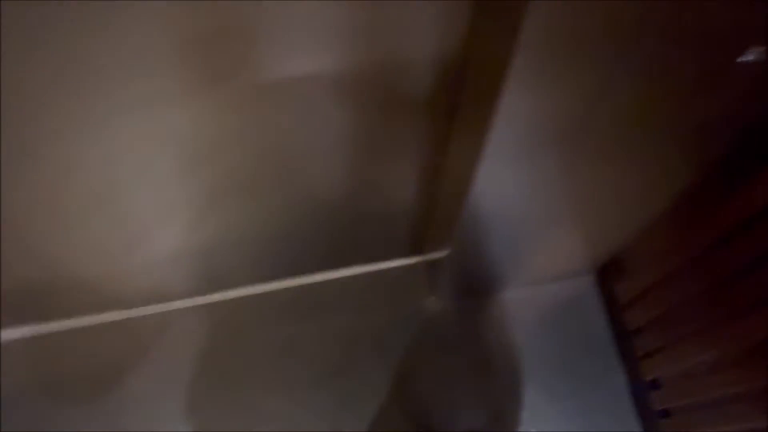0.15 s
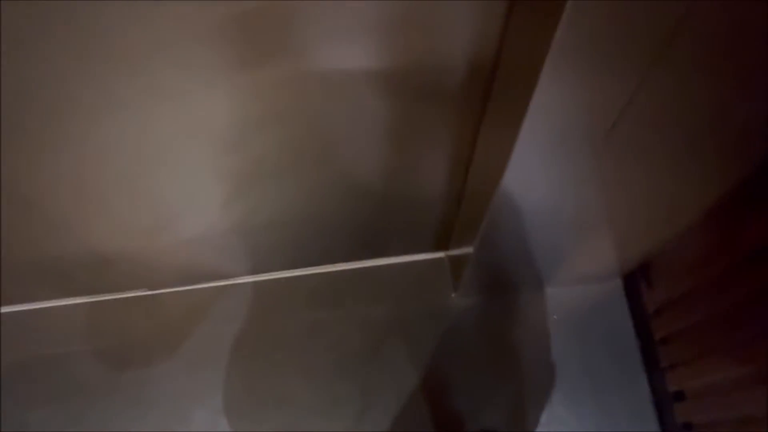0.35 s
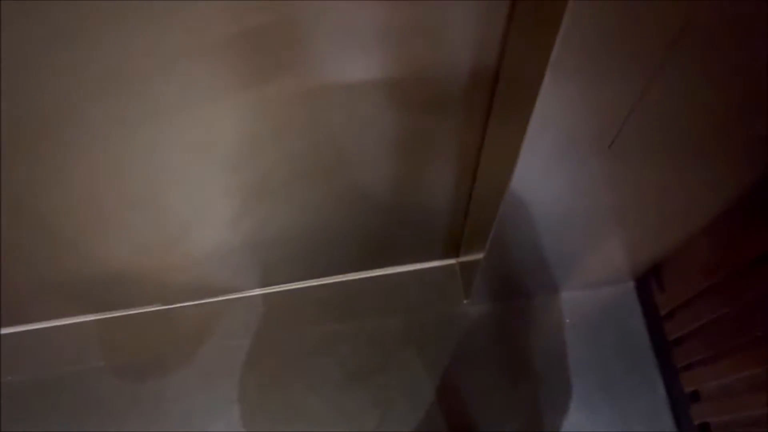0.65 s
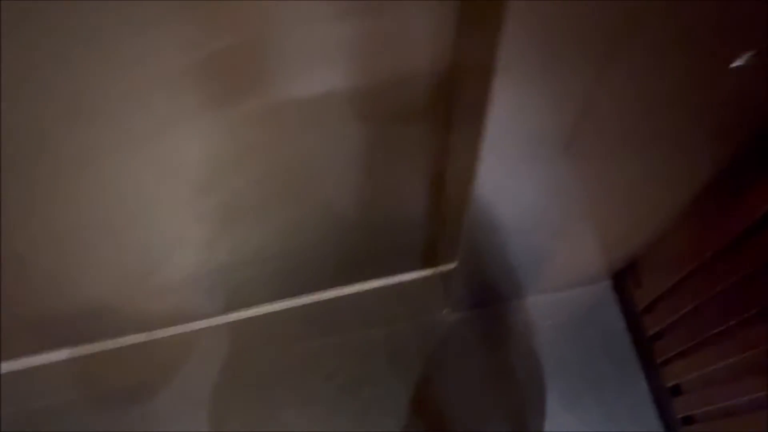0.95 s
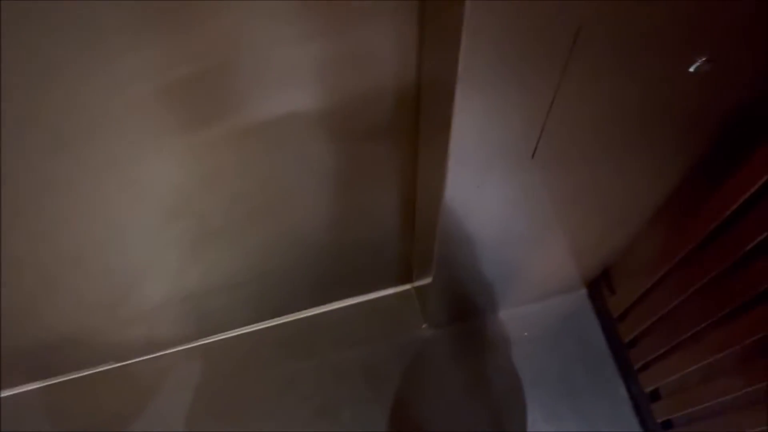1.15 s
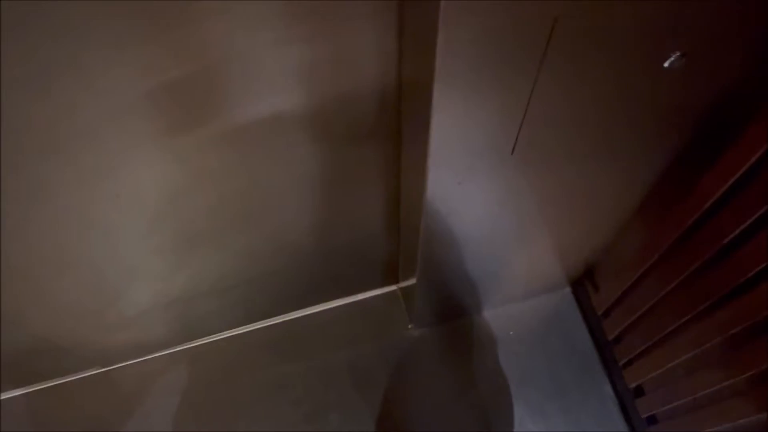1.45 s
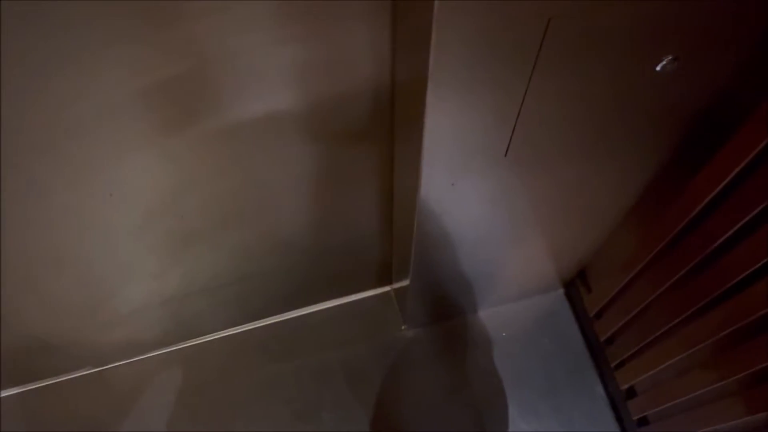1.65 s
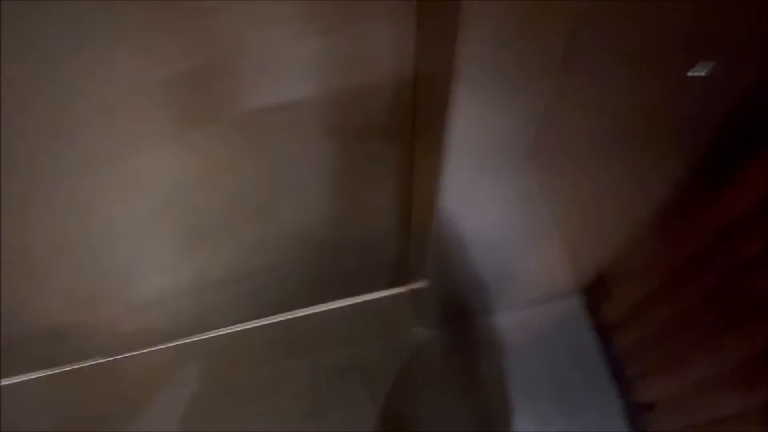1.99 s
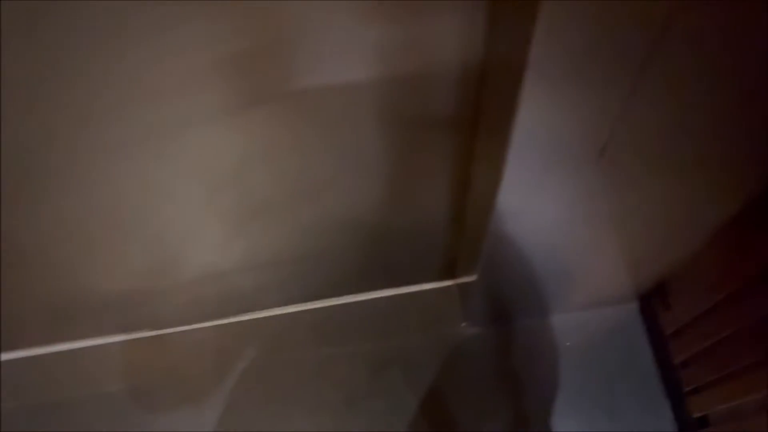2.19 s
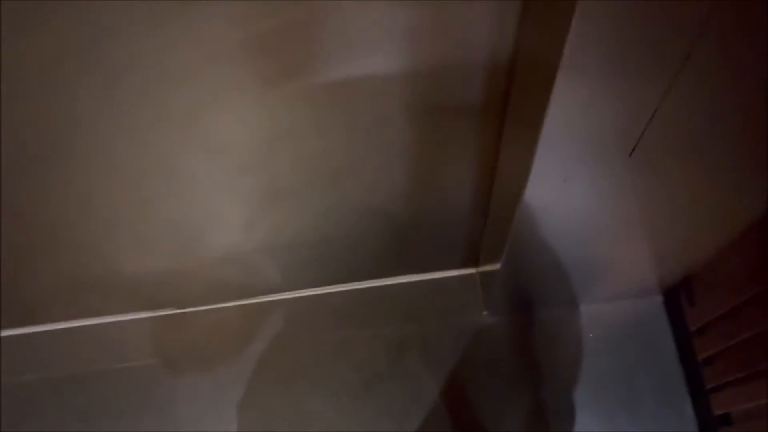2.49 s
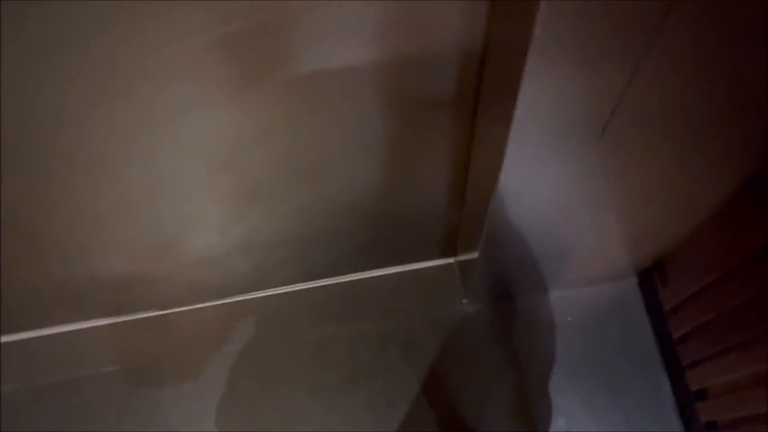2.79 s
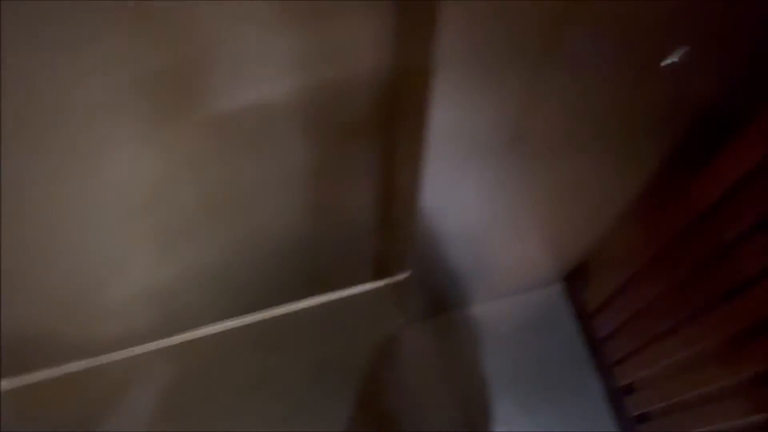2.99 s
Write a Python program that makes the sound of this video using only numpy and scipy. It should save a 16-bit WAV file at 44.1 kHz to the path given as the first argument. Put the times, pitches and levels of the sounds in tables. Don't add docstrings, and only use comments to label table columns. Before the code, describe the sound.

Low steady hum and rumble of a moving lift cabin, with one knock and faint bumps

```python
import sys
import numpy as np
from scipy import signal
from scipy.fft import rfft, irfft
from scipy.io import wavfile
from scipy.ndimage import uniform_filter1d

SR = 44100
rng = np.random.default_rng(int(sys.argv[2]) if len(sys.argv) > 2 else 0)


def int16_out(signal):
    q = np.round(np.clip(np.atleast_2d(signal).T, -1, 1) * 32767)
    wavfile.write(sys.argv[1], SR, q.astype(np.int16))


def gain_from_db(level_db):
    decades = np.asarray(level_db, float) / 20
    return 10 ** decades


N = 138474
T = np.arange(N) / SR
SWELL_DB = 0.6

# f/Hz, density/dB
CLOTH_SPECTRUM = [(1200, 11.5), (3000, 12.5), (6000, -2), (10000, -11), (15000, -21.5)]
# f/Hz, density/dB
CRACK_SPECTRUM = [(300, 15.5), (1000, 16), (2000, 0), (4500, -14), (7000, -12), (11000, -2.5),
                  (15000, -10.5)]


def unit(x):
    return x / np.sqrt(np.mean(x ** 2))


def band(x, hz, width):
    return signal.lfilter(*signal.iirpeak(hz, hz / width, fs=SR), x)


def shape(table, hz):
    points = np.array(table)
    return np.interp(np.log(hz), np.log(points[:, 0]), points[:, 1])


def coloured(table):
    hz = np.maximum(np.arange(N // 2 + 1) * SR / N, 1)
    spectrum = rfft(rng.standard_normal(N)) * gain_from_db(shape(table, hz))
    return unit(irfft(spectrum, N))


def walk(rate):
    hold = int(SR / rate)
    steps = np.repeat(rng.standard_normal(N // hold + 1), hold)
    return 1.3 * uniform_filter1d(uniform_filter1d(steps, hold), hold)[:N]


def decay(start, t60):
    return (T >= start) * np.exp(-np.log(1000) * np.maximum(T - start, 0) / t60)


def ring(start, hz, t60):
    return decay(start, t60) * np.sin(2 * np.pi * hz * (T - start))


def spread(mid, side):
    return np.array([mid + side, mid - side])


def pan(x, db):
    return x * gain_from_db(np.array([[db / 2], [-db / 2]]))


def rumble():
    # f/Hz, width/Hz, level/dB, side re centre/dB
    cabin_modes = [(55.6, 12.7, -41, -27.5), (106.36, 13, -39, -26), (125.9, 26.4, -45.5, -21),
                   (186.1, 12, -47.5, -22), (199.7, 10.3, -51, -8), (320.4, 18.5, -49, -4),
                   (365.2, 6.2, -53, -16.5), (455.1, 13, -59, -6), (498.8, 11.5, -60, -11),
                   (609.4, 64, -59.5, -3.5), (750, 110, -65, 3.5), (1916, 120, -69, -6.5)]
    out = 0
    for hz, width, db, side_db in cabin_modes:
        mid, side = (unit(band(band(rng.standard_normal(N), hz, width), hz, 2 * width)) for _ in range(2))
        out = out + gain_from_db(db + SWELL_DB * walk(2.61)) * spread(mid, gain_from_db(side_db) * side)
    return out


def air():
    # f/Hz, density/dB
    centre_spectrum = [(25, -4), (47, -0.5), (114, -0.5), (160, -3), (315, -8.5), (900, -31), (2200, -32),
                       (5000, -55), (8000, -83)]
    # f/Hz, density/dB
    side_spectrum = [(15, -63), (25, -28), (248, -2), (666, -24), (716, -20), (789, -18), (1710, -27),
                     (3700, -38), (8000, -57), (10400, -94), (17600, -120)]
    centre_db, side_db, flicker_db = -41, -49.5, 1.2
    mid, side, swell = 0, 0, walk(1.0)
    for hz in 25 * 2 ** np.arange(0, 8.6, .5):
        m, s = (band(band(rng.standard_normal(N), hz, hz / 2), hz, hz / 2) for _ in range(2))
        move = gain_from_db(SWELL_DB * swell + flicker_db * walk(7.87))
        mid = mid + move * gain_from_db(shape(centre_spectrum, hz)) * m
        side = side + move * gain_from_db(shape(side_spectrum, hz)) * s
    return spread(unit(mid) * gain_from_db(centre_db), unit(side) * gain_from_db(side_db))


def whine():
    # t/s, first/dB, second/dB, third/dB, fourth/dB
    partial_levels = [(0, -68, -68, -78, -71), (.29, -77, -61, -88, -77.5), (.41, -77, -57, -83.5, -75),
                      (.6, -71, -58.5, -61, -78), (.72, -80, -57.5, -70, -81), (.9, -71, -58, -76.5, -76),
                      (1.13, -79, -70, -75, -77), (1.29, -87, -56.5, -65, -80.5),
                      (1.42, -67, -69, -73, -89), (1.501, -85, -65, -61, -83),
                      (1.681, -62, -55.5, -74.5, -76.5), (1.84, -84, -58.5, -76.5, -76),
                      (2.08, -68, -61.5, -76, -74), (2.26, -58, -50.5, -72.5, -70.5),
                      (2.53, -83, -56.5, -74, -70), (2.78, -75, -58.5, -75, -80),
                      (2.99, -82, -75, -73, -71), (3.14, -78, -59, -78, -82)]
    # multiple of the fundamental, level/dB
    faint_partials = [(5, -87), (6, -90.5), (7, -99.5)]
    # t/s, depth/dB, length/s
    node_crossings = [
        (0.227, -8, 0.019),
        (0.909, -12, 0.013),
        (1.054, -8, 0.013),
        (1.19, -8, 0.023),
        (1.77, -19, 0.026),
        (1.98, -12, 0.01),
        (2.11, -10, 0.019),
        (2.6, -5, .015),
    ]
    drive_hz, drift_hz = 896.8, 0.44
    wander_db, flutter_db, ear_phase = 1.6, 1.8, 0.9
    levels = np.array(partial_levels).T
    phase = 2 * np.pi * np.cumsum(drive_hz + drift_hz * walk(5.91)) / SR
    parts = [(k, np.interp(T, levels[0], levels[k]), 1.0) for k in range(1, 5)]
    parts += [(k, db, wander_db) for k, db in faint_partials]
    node_db = sum(depth * np.exp(-((T - s) / d) ** 2) for s, depth, d in node_crossings)
    out = 0
    for k, db, ear_wander_db in parts:
        common_db = db + node_db + flutter_db * walk(22.18)
        sway = 0.9 * walk(9)
        ears = []
        for ear in range(2):
            level = gain_from_db(common_db + ear_wander_db * walk(5.97))
            ear_shift = ear * (ear_phase + 0.16 * walk(5.1))
            ears.append(level * np.sin(k * phase + sway + ear_shift))
        out = out + np.sqrt(2) * np.array(ears)
    return out


def floor():
    # t/s, peak/dB, f/Hz, hold/s, T60/s
    floor_thumps = [(0.066, -30.5, 60.8, 0.04, .2), (0.239, -33, 110.4, 0.039, 0.12),
                    (.44, -38, 186, .02, 0.1), (.5, -33, 99.4, 0.038, 0.13), (.65, -35.5, 170, 0.022, .12),
                    (1.002, -37, 56.7, 0.054, .25), (1.081, -32.5, 102.7, 0.033, .2),
                    (1.302, -36.5, 63, .04, 0.19), (1.398, -28.5, 113, .02, 0.093),
                    (1.81, -33.5, 57, 0.025, .2), (1.972, -33.5, 100, 0.03, 0.17),
                    (2.112, -31.5, 61.2, 0.045, 0.27), (2.3843, -23, 101.5, .052, .12),
                    (2.3843, -28, 135, .01, .06), (2.3, -37.5, 146, .03, .15),
                    (2.533, -30, 63.2, .04, 0.25), (2.663, -29.5, 127.5, 0.017, 0.14),
                    (2.978, -32.5, 106, 0.065, .2)]
    rise_s = 0.0021
    out = 0
    for s, db, hz, hold, t60 in floor_thumps:
        onset = np.clip((T - s) / rise_s, 0, 1)
        held = np.where(T < s + hold, onset, decay(s + hold, t60))
        out = out + gain_from_db(db) * held * np.sin(2 * np.pi * hz * (T - s))
    return out


def cloth():
    # t/s, body level/dB, brush level/dB
    rub_levels = [(0, -71.5, -90.5), (.15, -75, -87), (.3, -80, -96.5), (.6, -75, -93), (.9, -79.5, -94.5),
                  (1.15, -100.5, -100), (1.85, -90, -100), (2.0, -78.5, -96), (2.3, -76.5, -94),
                  (2.75, -85.5, -102.5), (2.9, -88.5, -95.5), (3.0, -83, -88.5), (3.14, -76, -85)]
    brush_hz, brush_width_hz = 12300, 9900
    t, body_db, brush_db = np.array(rub_levels).T
    grain_db = 2.0 * walk(25.21) + 12
    brush = unit(band(rng.standard_normal(N), brush_hz, brush_width_hz))
    body = spread(coloured(CLOTH_SPECTRUM), 0.99 * coloured(CLOTH_SPECTRUM))
    hiss = gain_from_db(np.interp(T, t, body_db) + grain_db) * body
    return hiss + gain_from_db(np.interp(T, t, brush_db) + grain_db) * brush


def keys():
    # t/s, peak/dB, f/Hz
    key_strikes = [(0.6404, -74.5, 12100), (.6677, -58, 12300), (.668, -54.5, 6850), (0.68, -67, 13700),
                   (0.7016, -55.5, 12300), (.748, -57, 12700), (0.776, -76, 14350), (0.8358, -58.5, 12200),
                   (0.85, -64, 12200), (0.851, -60, 7250), (0.8772, -65, 12000), (.893, -68, 12300),
                   (.9565, -73.5, 12300), (1.0155, -69.5, 12000), (1.1112, -67, 12300)]
    ring_t60_s, tick_t60_s, tick_db = 0.02, 0.008, -3
    tick = coloured(CLOTH_SPECTRUM)
    out = 0
    for s, db, hz in key_strikes:
        contact = gain_from_db(tick_db) * decay(s, tick_t60_s) * tick
        out = out + gain_from_db(db) * (ring(s, hz, ring_t60_s) + contact)
    return out


def knock():
    # f/Hz, width/Hz, level/dB
    panel_modes = [(560, 90, -7), (760, 65, -5), (1000, 75, -10), (1230, 85, -6), (1550, 150, 2.5),
                   (1990, 110, 0.5), (2190, 100, 1.5), (2830, 300, -2.5), (4300, 770, -6.5),
                   (5230, 720, -6.5), (7130, 1100, -12), (10140, 1500, -6), (12500, 2000, -10)]
    start_s, push_s, bounce_s = 0.4402, 0.0068, 0.4487
    level_db, blow_db, bounce_db, crack_db = -30.5, 11, -3, -7
    end = start_s + push_s
    push = np.where(T < end, decay(start_s, 0.082), 0.24 * decay(end, 0.13))
    blows = gain_from_db(blow_db) * (decay(start_s, 0.00055) - gain_from_db(bounce_db) * decay(bounce_s, .001))
    shared, ears = coloured(CRACK_SPECTRUM), []
    crack = gain_from_db(crack_db) * (0.19 * push + 1.6 * decay(start_s, 0.0046)) * shared
    for _ in range(2):
        force = blows + push * (0.88 * rng.standard_normal(N) + 0.47 * shared)
        modes = 0
        for k, (hz, width, db) in enumerate(panel_modes):
            gain = gain_from_db(db) * np.sqrt(4000 / width) * (-1) ** k
            modes = modes + gain * band(force, hz, width)
        ears.append(modes + crack)
    return gain_from_db(level_db) * np.array(ears)


def shoe():
    # t/s, peak/dB, f/Hz, length/s, crack/dB
    sole_clicks = [(0.675, -48.5, 1205, 0.0065, -5), (0.682, -46, 766, .006, -22),
                   (2.3692, -61, 11600, 0.0018, 2), (2.374, -51, 11000, .001, 10.5),
                   (2.381, -57.5, 12400, .0015, 2), (2.384, -44, 4470, 0.0033, -1.5),
                   (2.3958, -44, 1000, 0.0019, 10), (2.3973, -45.5, 3600, 0.0021, -1),
                   (2.4043, -45, 2020, 0.0027, 4.5), (2.4162, -50, 11500, .0015, 9),
                   (2.4205, -50, 3500, .0015, -2), (2.4168, -54, 6600, .0015, -9),
                   (2.4304, -49, 4200, 0.0015, 3), (2.429, -45, 810, 0.0068, -19.5),
                   (2.411, -37.5, 499, 0.016, -29.5), (2.538, -68, 11700, 0.0018, -2.5),
                   (2.5518, -45, 4300, .002, 1), (2.5535, -42, 2150, .0025, -14),
                   (2.555, -48.5, 860, .008, -26), (2.558, -49, 1255, 0.0068, -28),
                   (2.613, -67, 6330, 0.0014, 7.5), (2.636, -70, 14000, 0.0017, -2.5),
                   (2.659, -60.5, 3860, 0.0013, 7), (2.657, -45.5, 1130, 0.0039, -20),
                   (2.6665, -40.5, 2080, .0028, -19), (2.6665, -50, 3940, .002, -9),
                   (2.672, -43.5, 750, .01, -15), (2.72, -49.5, 620, 0.007, -30)]
    rise_s, q, crack_t60_s = 0.0015, 3.5, 0.016
    crack = np.array([coloured(CRACK_SPECTRUM), coloured(CRACK_SPECTRUM)])
    grit = rng.standard_normal((2, N))
    clicks = 0
    for s, db, hz, length, crack_db in sole_clicks:
        burst = (decay(s, 7 * length) - decay(s, rise_s)) * grit
        scrape = np.sqrt(12700.0 * q / hz) * band(burst, hz, hz / q)
        tone = 1.84 * ring(s, hz, 5 * length)
        snap = gain_from_db(crack_db + 5.5) * decay(s, crack_t60_s) * crack
        clicks = clicks + gain_from_db(db) * (scrape + tone + snap)
    return clicks


def cabin_echo(x):
    low_t60_s, treble_t60_s = 0.51, 0.4
    t = np.arange(SR // 2) / SR
    noise = rng.standard_normal((2, len(t)))
    low = signal.lfilter(*signal.butter(1, 3000, fs=SR), noise)
    treble = 0.65 * (noise - low)
    tail = low * gain_from_db(-60 * t / low_t60_s) + treble * gain_from_db(-60 * t / treble_t60_s)
    tail = tail * np.clip(t / 0.01, 0, 1)
    return signal.fftconvolve(x, tail / np.sqrt(np.sum(tail[0] ** 2)), axes=1)[:, :N]


def scene():
    hit, jingle, clicks = knock(), keys(), shoe()
    background = rumble() + air() + whine() + floor() + cloth()
    direct = hit + jingle + pan(clicks, -3)
    echo = cabin_echo(hit + gain_from_db(-3) * clicks + gain_from_db(-3.5) * jingle)
    return background + direct + gain_from_db(-2.5) * echo


def roll_off(x):
    return signal.sosfilt(signal.butter(12, 15760, fs=SR, output="sos"), x)


def record(dry):
    # f/Hz, left minus right/dB
    body_shade = [(60, 0), (250, -1.8), (700, -1), (1500, 2.5), (2500, 3), (4500, 7.5), (6000, 2)]
    one_port_hz, in_phase_hz, plateau_hz, port_lag_s, low_cut_hz = 5700, 11350, 1500, 0.00017, 37
    hz = np.maximum(np.arange(N // 2 + 1) * SR / N, 1)
    left, right = rfft(dry)
    one = 1 / (1 + (one_port_hz / hz) ** 12)
    offset_hz = hz - in_phase_hz
    turn = np.exp(2j * np.pi * (offset_hz - np.clip(offset_hz, 0, plateau_hz)) * port_lag_s)
    right = np.sqrt(1 - one) * right + np.sqrt(one) * left * turn
    shade = gain_from_db((1 - one) * shape(body_shade, hz) / 2)
    high_pass = 1 / np.sqrt(1 + (low_cut_hz / hz) ** 6)
    mix = irfft(np.array([left * shade, right / shade]) * high_pass, N)
    return roll_off(mix)


dry = scene()
out = record(dry)
int16_out(out)
```